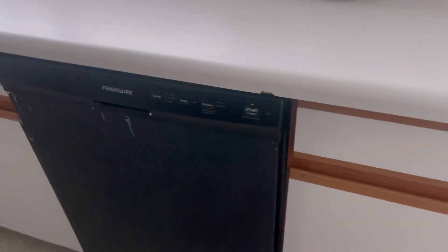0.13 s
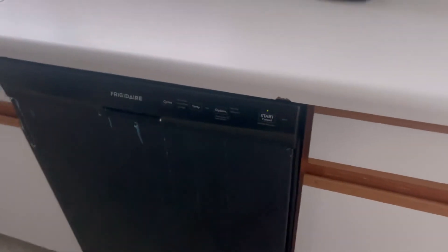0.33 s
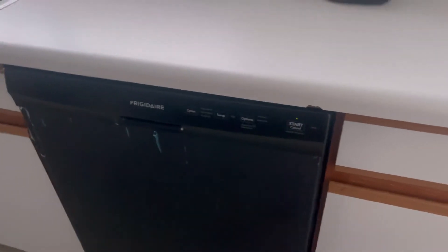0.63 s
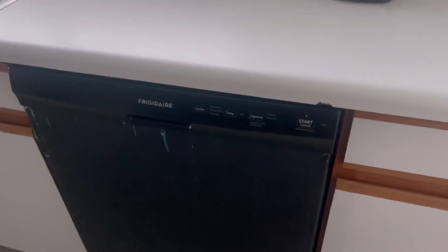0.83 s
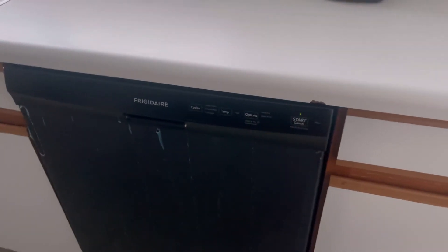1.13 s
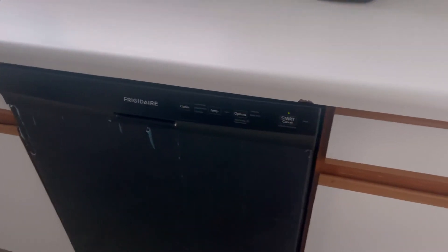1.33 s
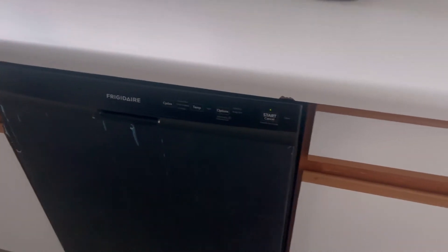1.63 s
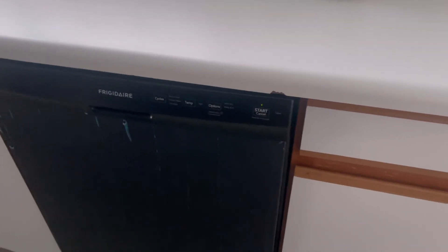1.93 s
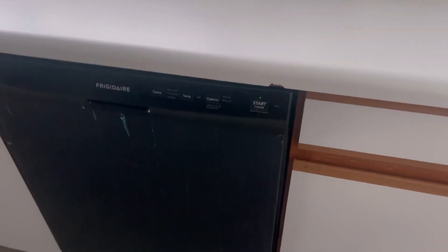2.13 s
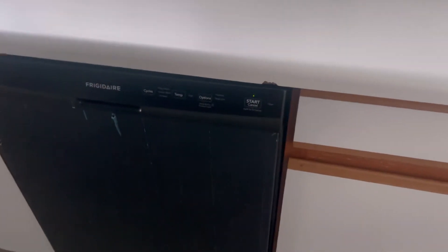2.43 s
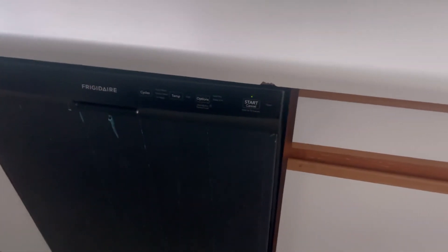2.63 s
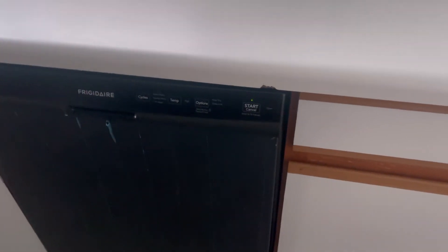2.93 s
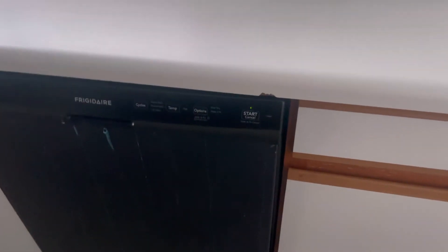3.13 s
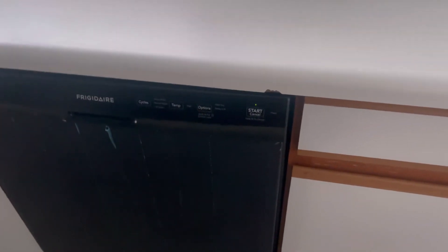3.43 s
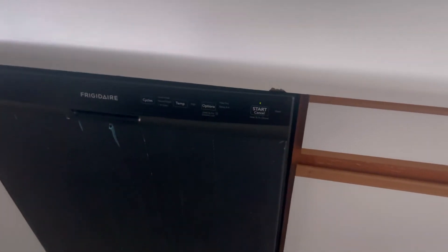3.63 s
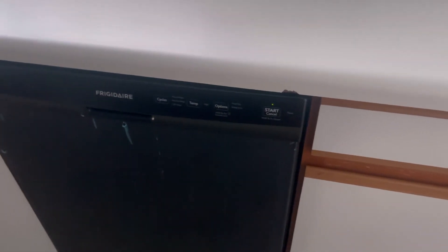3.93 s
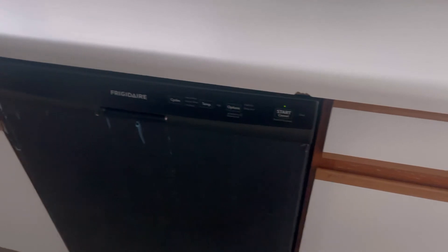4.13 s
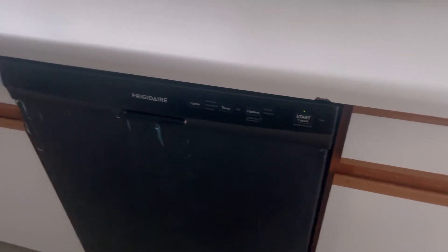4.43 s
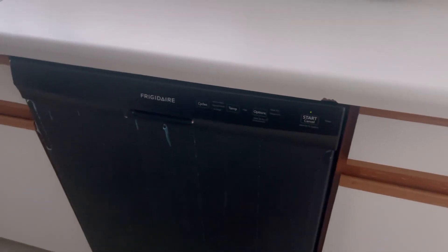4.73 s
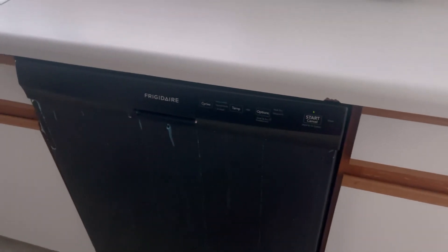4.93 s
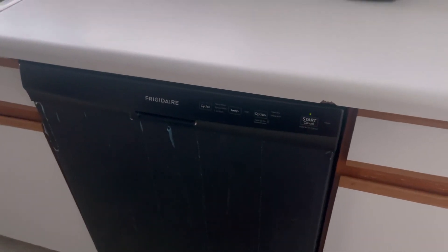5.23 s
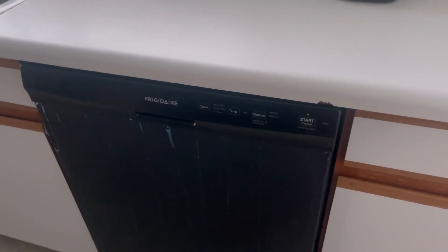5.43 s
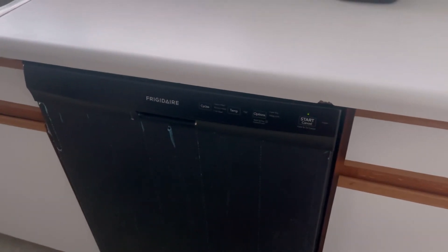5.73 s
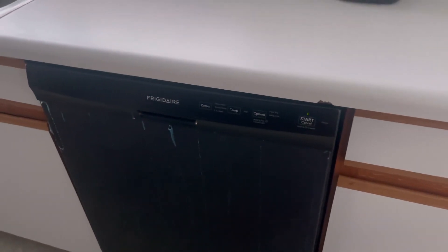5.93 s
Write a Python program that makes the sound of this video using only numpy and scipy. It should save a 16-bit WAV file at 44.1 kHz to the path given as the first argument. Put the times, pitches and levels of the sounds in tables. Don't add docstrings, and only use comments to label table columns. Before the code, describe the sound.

A dishwasher hums steadily with rattling panels and floor boom, loose cutlery clinks early on, then water slops, gurgles and sprays inside the tub.

```python
import sys
import numpy as np
from scipy import signal
from scipy.fft import rfft, irfft, next_fast_len
from scipy.io import wavfile

SR = 44100
rng = np.random.default_rng(int(sys.argv[2]) if len(sys.argv) > 2 else 0)


def log_audio(samples):
    frames = np.atleast_2d(samples).T
    limited = np.clip(frames, -1, 1)
    pcm = np.round(limited * 32767).astype(np.int16)
    wavfile.write(sys.argv[1], SR, pcm)


def elevation(decibels):
    levels = np.asarray(decibels, float)
    return 10 ** (levels / 20)


N = 267687

MAINS_HZ = 59.99
# multiple of mains, level/dB (rms), left minus right/dB, lead of the right port/rad
HUM_LINES = [(1, -50, -2.5, 0.38), (2, -50, -1, 0.22), (3, -34, -1.5, 0.41), (4, -65, -12.5, .4),
             (6, -57.5, -2, -0.082), (8, -73, -0.5, -0.0027)]
# t/s, level/dB (rms)
SWAY = [(0.0, -34.5), (0.35, -32.5), (0.49, -35), (0.61, -33), (1.01, -32), (1.08, -34.5), (1.49, -31.5),
        (1.64, -33.5), (1.72, -30.5), (1.84, -33), (2.59, -34), (4.36, -33.5), (4.46, -35.5), (4.72, -31.5),
        (4.8, -33), (5.49, -32), (6.07, -33)]

# t/s of full swing, level/dB (rms), held/s
FLOOR_THUDS = [(.02, -50, .2), (.54, -58, .01), (.62, -51, 0.012), (.72, -47, .02), (.82, -40.5, 0.12),
               (.96, -37, 0.041), (1.15, -37, 0.018), (1.24, -38, 0.07), (1.63, -52, 0.0088),
               (1.74, -43.5, 0.023), (1.86, -39.5, 0.029), (2.34, -46, .01), (2.68, -51, 0.012),
               (2.89, -44.5, 0.034), (3.13, -41.5, 0.013), (3.40, -50.5, 0.026), (3.80, -44, 0.034),
               (3.94, -40.5, 0.02), (4.09, -48, 0.21), (4.62, -50.5, .03), (4.82, -44.5, .34),
               (5.23, -45.5, .02), (5.39, -45.5, 0.042), (5.68, -44.5, 0.069), (5.95, -53, .12)]
FLOOR_HZ, FLOOR_SAG_HZ_PER_S = 64.5, 0.8
FLOOR_REST_DB, FLOOR_RISE_DB_PER_S, FLOOR_FALL_DB_PER_S = -76.5, 299.5, 145.5

# f/Hz, width/Hz, level/dB
CABINET_MODES = [(84.3, 7.2, -8.5), (105.9, 8, -4), (135.3, 1.9, 1), (160, 5.9, -4), (212.4, 8.1, -9),
                 (246, 90, -4), (268.4, 12, 0.5), (285.6, 9.4, 0.5), (322.6, 5.4, -2.5), (357.8, 12, 0),
                 (425.8, 6.1, -6.5), (452, 25, -8)]
# f/Hz, level/dB (per Hz)
RUMBLE_COLOUR = [(22, -34), (35, -20), (55, 2.5), (90, -6.5), (140, -11.5), (210, -4), (300, -13.5),
                 (400, -12), (480, -23.5)]

# t/s, ring f/Hz, fainter ring f/Hz, ring level/dB (rms), tick level/dB
CUTLERY_JINGLES = [(0.4920, 3050, 8900., -60.5, -61.5), (0.6010, 8140, 6180, -48.5, -50),
                   (0.6160, 9200, 4800, -56.5, -57.5), (0.6400, 6230., 3380, -54.5, -56),
                   (0.6780, 6340., 2880, -63, -52), (0.7530, 6500., 4440., -64.5, -59.5),
                   (0.9370, 1954, 3360., -57.5, -79), (1.0430, 3410, 4320., -56, -58),
                   (1.053, 6100, 4580, -59.5, -51.5), (1.0850, 3620., 2800, -55, -61.5),
                   (1.1190, 3515, 8000, -55., -55.5), (1.1350, 3930, 9040., -55.5, -59),
                   (1.1600, 3320, 7860, -61, -65), (1.707, 5150., 3120, -65, -65),
                   (1.8550, 6300, 4550, -58.5, -48.5), (1.8610, 2200, 11200., -58, -67.5),
                   (2.2400, 2210, 3460, -55.5, -69)]
# t/s, ring f/Hz, ring level/dB
# (rms), tick level/dB
ONE_RING_TOUCHES = [
    (0.0050, 8160, -64., -72),
    (0.151, 8270, -63, -55),
    (0.8920, 6200, -66.5, -78),
    (0.9560, 8240, -56.5, -66),
    (1.2120, 2760, -52.5, -71),
    (1.222, 8300, -60.5, -53.5),
    (1.6310, 1014, -48.5, -75),
    (1.7030, 1993, -53, -69),
    (1.733, 1790, -52, -63),
]
FAINTER_DB = -4.5
# t/s, peak level/dB
DRY_CLICKS = [
    (.6021, -54),
    (1.2232, -42),
    (1.232, -52),
    (1.246, -52),
    (1.8563, -56),
]

# t/s,
# level/dB
FLOW = [(0.0, -5), (.4, -10.5), (.64, -1), (1.0, -6), (1.07, 1.7), (1.22, -2), (1.28, -7), (1.58, -12.5),
        (1.67, -5.5), (1.95, 0.5), (2.15, 1.5), (2.7, -1), (3.1, 1.2), (3.5, -.5), (4.3, 0), (4.9, 1.5),
        (6.07, 1)]
PANEL_DB, LOW_DB, HIGH_DB, SPLASH_DB, HISS_DB = -49.5, -56.5, -58, -60, -72
PANEL_FOLLOWS, LOW_FOLLOWS, HIGH_FOLLOWS, SPLASH_FOLLOWS, HISS_FOLLOWS = 0.18, 0.92, 0.97, 0.44, 0.53
# f/Hz, width/Hz, level/dB
TUB_MODES = [(516.5, 7.2, -6), (580, 16, -3.5), (635.6, 17, -5.5), (704, 19, -2), (768, 7.7, -1.5),
             (831.4, 32, -2.5), (895.7, 12, -2), (1051, 13, 0), (1113, 22, -4.5), (1159.6, 6.2, -1),
             (1285, 22, 0), (1562, 34, -4.5)]
# t/s, pitch f/Hz, lift/dB, held/s
SLOPS = [(.10, 115.4, 6., .35), (0.701, 620., 3, .3), (1.20, 280., 2, .05), (1.20, 680., 6, .04),
         (1.47, 1150., 13.5, .08), (2.00, 580., 9.5, .1), (2.08, 1100., 1.5, .05), (2.12, 770., 2, .1),
         (2.25, 620., 7.5, .08), (2.45, 600., 5, .02), (2.66, 360., 1.5, .08), (2.95, 1050., 3.5, .04),
         (3.00, 280., 6.5, .06), (3.10, 620., 7.5, .12), (3.28, 520., 8.5, .08), (3.35, 360., 4.5, .3),
         (3.40, 830., 5, .15), (3.84, 600., 7.5, .02), (3.90, 1100., 5.5, .02), (3.90, 280., 8.5, .08),
         (4.02, 800., 6, .02), (4.42, 770., 8.5, .05), (4.45, 350., 2, .12), (4.78, 300., 6.5, .05),
         (4.97, 1050., 5., .03), (5.00, 880., 1, .05), (5.22, 280., 4, .1), (5.45, 830., 7, .1),
         (5.702, 950., 7.5, .12), (5.849, 280., 3.5, .05)]
SLOP_RISE_S, SLOP_FALL_S, SLOP_OCTAVES = 0.066, 0.071, 0.3
SPRAY_SHARE = 0.43
# f/Hz, level/dB (per Hz)
SPRAY_COLOUR = [(260, -31.5), (450, -12.5), (658, -5.5), (757, -10), (897, -5.5), (952, -4), (1050, -2.5),
                (1410, -10.5), (1550, -10.5), (1840, -14), (2590, -17), (3130, -22.5), (4900, -21.5),
                (6370, -49), (10800, -120)]
# f/Hz, level/dB (per Hz)
HISS_COLOUR = [(4500, -8.5), (5300, 0), (6200, -1.5), (6900, -9.5), (8100, -7.5), (9200, -7.5),
               (10200, -7.5), (11400, -17.5), (12400, -14)]
# t/s of full strength, level/dB (rms), held/s
CLOTH_RUSTLES = [
    (.01, -69, 0.19),
    (1.15, -78.5, 0.023),
    (1.93, -84, 0.017),
    (2.48, -76, 0.074),
]
RUSTLE_RISE_DB_PER_S, RUSTLE_FALL_DB_PER_S = 46.5, 40.5

WALL_ECHOES = (.0067, .0113, .0179, .0291)
# f/Hz, correlation
LIKENESS = [(60, 1), (110, 0.92), (200, 0.8), (350, 0.81), (640, 0.047), (1150, 0.3), (2070, 0.021),
            (3740, 0.085), (6750, 0.14), (12200, 0.17)]
# f/Hz, left minus right/dB
LEAN = [(60, 0.5), (110, 1), (200, 2), (350, -8.5), (640, -3.5), (1150, -1), (2070, -7), (3740, 2.5),
        (6750, 9), (12200, -6.5)]
# f/Hz, share
BOND = [(60, 0.85), (200, 1), (350, 0.94), (600, 0.46), (1100, 0.49), (2200, 0.54), (4500, .4),
        (8000, 0.22), (12000, 0.92)]


def motor():
    mains_phase = 2 * np.pi * MAINS_HZ * np.arange(N) / SR
    sway_db = in_time(SWAY)[0]
    side = np.array([[1], [-1]]) / 2
    out = 0
    for multiple, db, pan_db, lead in HUM_LINES:
        swell_db = sway_db - sway_db.mean() if multiple == 3 else drift(3.7)
        phase = multiple * mains_phase + rng.uniform(0, 2 * np.pi) + 0.24 * drift(0.36)
        out = out + np.sqrt(2) * elevation(db + swell_db + pan_db * side) * np.sin(phase - lead * side)
    return out


def floor_boom():
    sag = FLOOR_SAG_HZ_PER_S * np.arange(N) / SR
    hz = FLOOR_HZ + 1.5 - sag + 2.4 * drift(10.4)
    tone = np.sqrt(2) * np.sin(2 * np.pi * np.cumsum(hz) / SR)
    shaken = elevation(FLOOR_REST_DB) + swells(FLOOR_THUDS, FLOOR_RISE_DB_PER_S, FLOOR_FALL_DB_PER_S)
    return shaken * tone * elevation([[-0.8], [0.8]])


def pump():
    ringing = body(CABINET_MODES, gulp_db=1.1, wander_db=-1.1, rate=0.87)
    rumble = elevation(1.0) * noise(RUMBLE_COLOUR, 22, 537, patchy_db=3.0)
    return stir(PANEL_DB, PANEL_FOLLOWS) * (ringing + rumble)


def cutlery():
    out, t = np.zeros((2, N)), np.arange(SR // 3) / SR
    touches = CUTLERY_JINGLES + ONE_RING_TOUCHES
    tick_band = signal.butter(2, [1900, 9800], "band", fs=SR, output="sos")
    for s, *rings, ring_db, tick_db in touches:
        white = rng.standard_normal((2, len(t)))
        tick_fade = elevation(-60 * t / 0.075) + 0.5 * elevation(-60 * t / 0.26)
        sound = elevation(tick_db) * signal.sosfilt(tick_band, white) * tick_fade
        for k, hz in enumerate(rings):
            clear_fade = elevation(1.0 - 60 * t / (0.02 + 420 / hz))
            clear = np.sin(2 * np.pi * hz * t + white[:, :1]) * clear_fade
            echo = resonance(np.roll(white, SR // 6, axis=1), hz, 90 + 0.036 * hz)
            echo = echo / np.std(echo) * elevation(-60 * t / 0.29) * np.minimum(t / 0.006, 1)
            sound = sound + elevation(ring_db + FAINTER_DB * k) * (clear + echo)
        at = round(s * SR)
        out[:, at:at + len(t)] += sound * elevation([[1.5], [-1.5]])
    return out


def snaps():
    out, t = np.zeros((2, N)), np.arange(SR // 50) / SR
    for s, db in DRY_CLICKS:
        at = round(s * SR)
        out[:, at:at + len(t)] += elevation(db - 60 * t / 0.006) * rng.standard_normal((2, len(t)))
    bright = signal.butter(2, [4200, 11000], "band", fs=SR, output="sos")
    return signal.sosfilt(bright, out + 1e-18)


def gurgle():
    low_spray = elevation(-5.0 + SPRAY_SHARE * slop_db(624)) * noise(SPRAY_COLOUR, 440, 860, patchy_db=5.0)
    low = body(TUB_MODES[:6], gulp_db=3.0, wander_db=0.9, rate=1.5) + low_spray
    high_spray = elevation(-0.9 + SPRAY_SHARE * slop_db(1050)) * noise(SPRAY_COLOUR, 843, 1450, patchy_db=1.1)
    high = body(TUB_MODES[6:], gulp_db=-0.55, wander_db=1.9, rate=4.4) + high_spray
    return stir(LOW_DB, LOW_FOLLOWS) * low + stir(HIGH_DB, HIGH_FOLLOWS) * high


def splash_and_rustle():
    splash = noise(SPRAY_COLOUR, 1380, 5020, patchy_db=1.5)
    hiss = noise(HISS_COLOUR, 5230, 14000, patchy_db=1.66)
    rustle = swells(CLOTH_RUSTLES, RUSTLE_RISE_DB_PER_S, RUSTLE_FALL_DB_PER_S)
    hiss_gain = stir(HISS_DB, HISS_FOLLOWS) + rustle
    return stir(SPLASH_DB, SPLASH_FOLLOWS) * splash + hiss_gain * hiss


def body(modes, gulp_db, wander_db, rate):
    drive = irfft(stereo(gulp_db * drift(25))[0], next_fast_len(N))[:, :N]
    out = 0
    for k, (hz, width, db) in enumerate(modes):
        gain = elevation(db + slop_db(hz) + wander_db * drift(rate)) / np.sqrt(width)
        out = out + (-1) ** k * gain * resonance(drive, hz, width)
    return out / np.std(out.mean(0))


def noise(colour, low_hz, high_hz, patchy_db):
    pair, hz = stereo()
    walls = 1 + 0.22 * sum(np.exp(-2j * np.pi * hz * lag) for lag in WALL_ECHOES)
    edges = 1 / (1 + (low_hz / hz) ** 8) / (1 + (hz / high_hz) ** 8)
    pair = pair * elevation(at_hz(colour, hz)) * edges * walls
    out = 0
    for centre in np.arange(np.log2(low_hz), np.log2(high_hz) + 1):
        window = np.cos(np.pi / 2 * np.clip(np.log2(hz) - centre, -1, 1)) ** 2
        band = irfft(pair * window, next_fast_len(N))[:, :N]
        out = out + elevation(patchy_db * drift(9.9)) * band
    return out / np.std(out.mean(0))


def stereo(gain_db=0):
    size = next_fast_len(N)
    hz = np.maximum(np.fft.rfftfreq(size, 1 / SR), 1)
    a, b = rfft(rng.standard_normal((2, N)) * elevation(gain_db), size)
    return ports(a, b, hz), hz


def ports(a, b, hz):
    bond = np.clip(at_hz(BOND, hz), 0, 0.999)
    alike = np.clip(at_hz(LIKENESS, hz), -bond, bond)
    turned = np.sqrt(bond ** 2 - alike ** 2)
    right = (alike - 1j * turned) * a + np.sqrt(1 - bond ** 2) * b
    lean = elevation(at_hz(LEAN, hz) / 2)
    return np.array([lean * a, right / lean])


def resonance(x, hz, width):
    r = np.exp(-np.pi * width / SR)
    poles = [1, -2 * r * np.cos(2 * np.pi * hz / SR), r * r]
    return signal.lfilter(np.array([1, 0, -1]) * (1 - r * r) / 2, poles, x)


def slop_db(hz):
    def lift(t):
        total = 0
        for s, pitch, up, held in SLOPS:
            nearness = np.exp(-(np.log2(pitch / hz) / SLOP_OCTAVES) ** 2)
            corners = [-SLOP_RISE_S, 0, held, held + SLOP_FALL_S]
            total = total + up * nearness * np.interp(t - s, corners, [0, 1, 1, 0])
        return total
    return coarse(lift)


def swells(events, rise_db, fall_db):
    def gain(t):
        total = 0
        for s, db, held in events:
            below = rise_db * np.maximum(s - t, 0) + fall_db * np.maximum(t - s - held, 0)
            total = total + elevation(db - below)
        return total
    return coarse(gain)


def stir(db, follows):
    return elevation(db + follows * in_time(FLOW)[0])


def drift(rate):
    r = np.exp(-80 * np.pi * rate / SR)
    white = rng.standard_normal(N // 40 + 2002)
    slow = signal.lfilter([1], [1, -2 * r, r * r], white)[2000:]
    return np.interp(np.arange(N) / 40, np.arange(len(slow)), rms_one(slow - slow.mean()))


def coarse(shape):
    dots = np.arange(0, N + 64, 64)
    return np.interp(np.arange(N), dots, shape(dots / SR))


def in_time(rows):
    s, *columns = np.transpose(rows)
    return [np.interp(np.arange(N) / SR, s, column) for column in columns]


def at_hz(points, hz):
    table_hz, values = np.transpose(points)
    return np.interp(np.log(hz), np.log(table_hz), values)


def rms_one(x):
    return x / np.sqrt(np.mean(x ** 2) + 1e-20)


def scene():
    return motor() + floor_boom() + pump() + cutlery() + snaps() + gurgle() + splash_and_rustle()


def band_limit(x):
    return signal.sosfilt(signal.butter(12, 12780, fs=SR, output="sos"), x)


def record(dry):
    mid, side = (dry[0] + dry[1]) / 2, (dry[0] - dry[1]) / 2
    for stage in range(2):
        mid = mid - 0.93 * resonance(mid, 10350, 1400) + 0.55 * resonance(mid, 11400, 800)
        side = side - 0.38 * resonance(side, 8800, 550) + 0.5 * resonance(side, 11000, 900)
    side = signal.sosfilt(signal.butter(4, 11800, fs=SR, output="sos"), side)
    heard = signal.sosfilt(signal.butter(2, 40, "high", fs=SR, output="sos"), [mid + side, mid - side])
    heard = signal.sosfilt(signal.butter(8, 11700, fs=SR, output="sos"), heard)
    return band_limit(heard)


dry = scene()
out = record(dry)
log_audio(out)
```